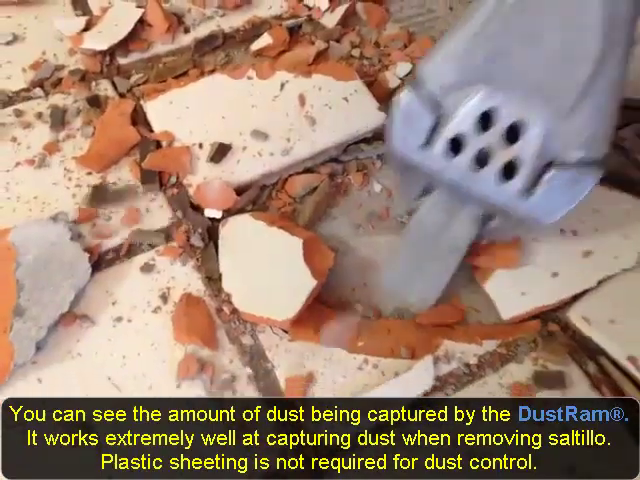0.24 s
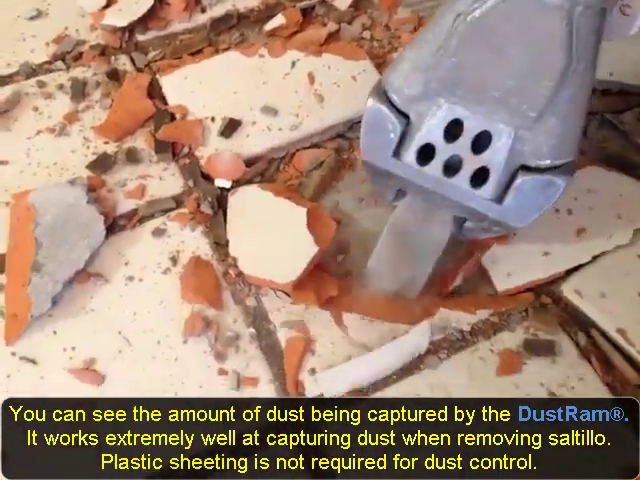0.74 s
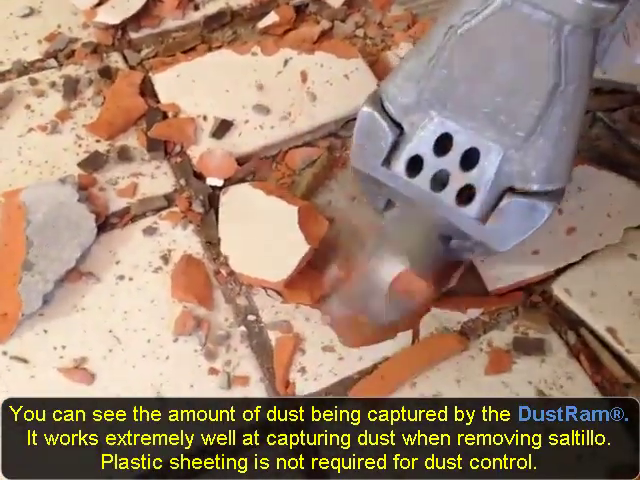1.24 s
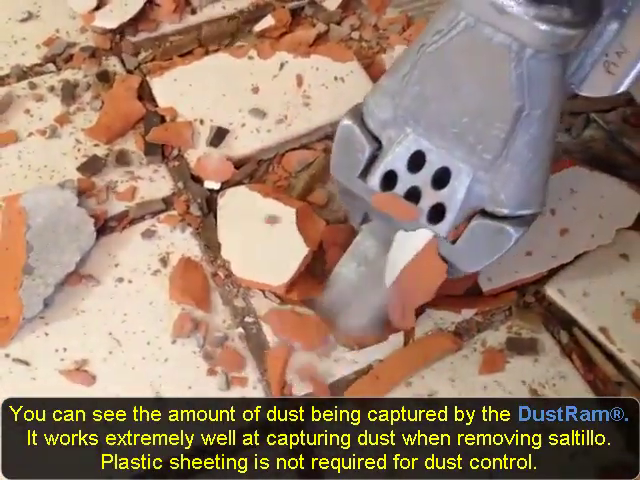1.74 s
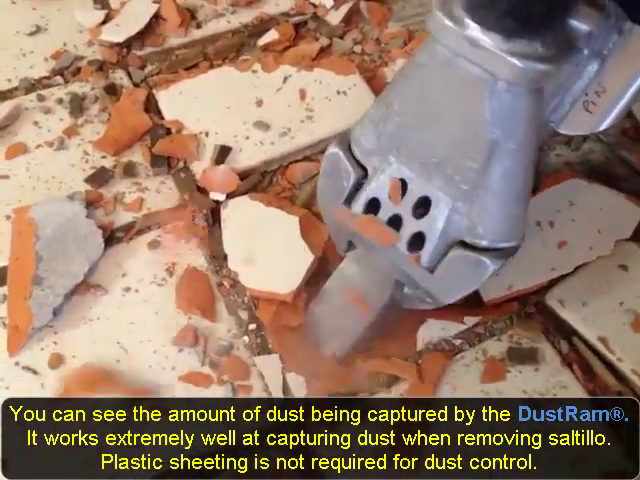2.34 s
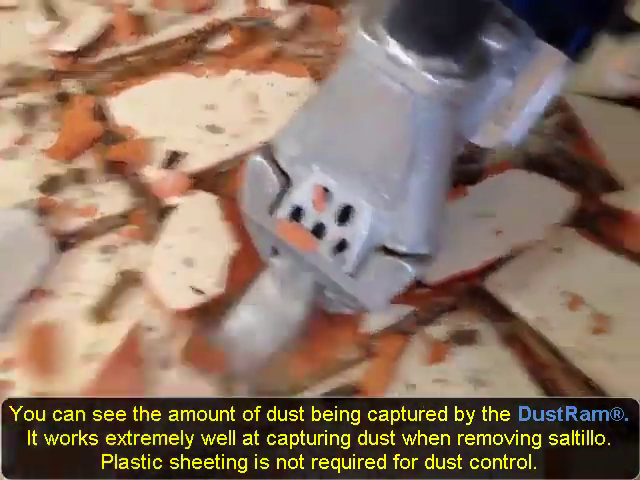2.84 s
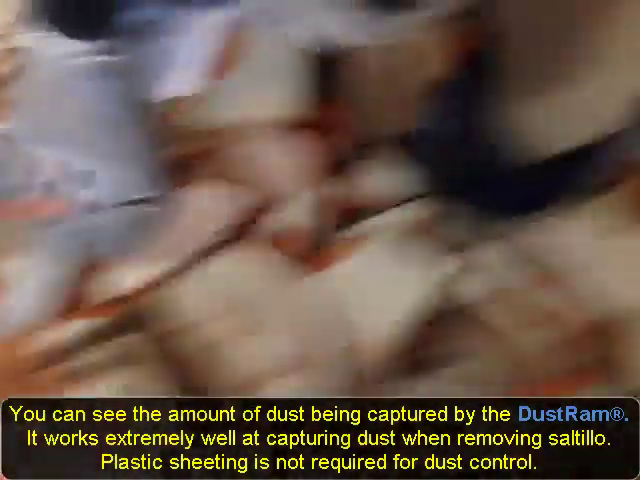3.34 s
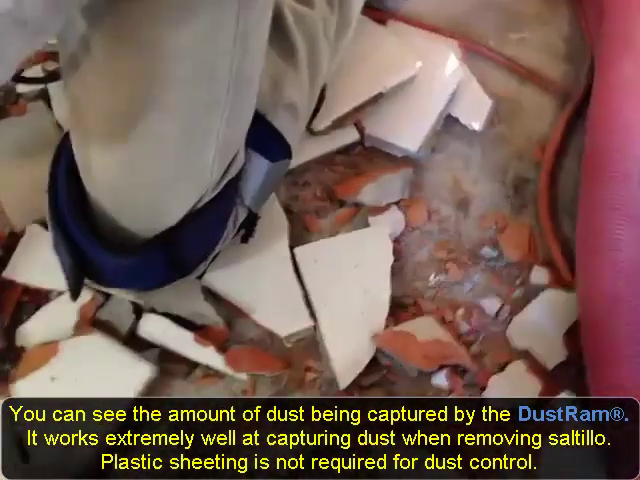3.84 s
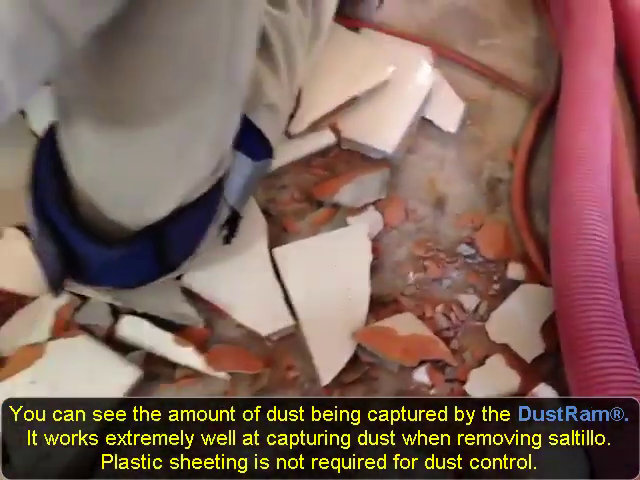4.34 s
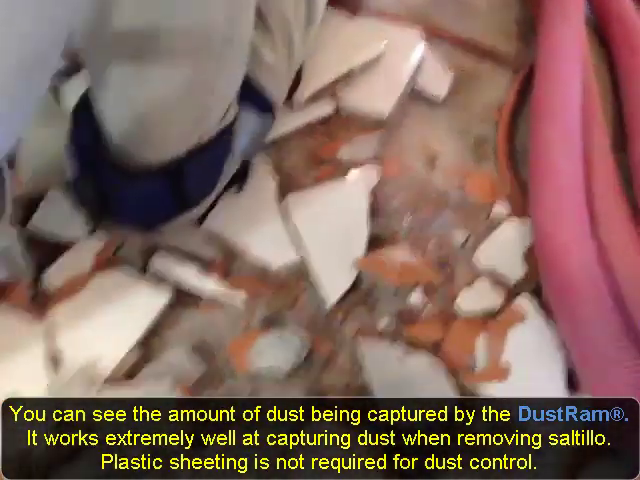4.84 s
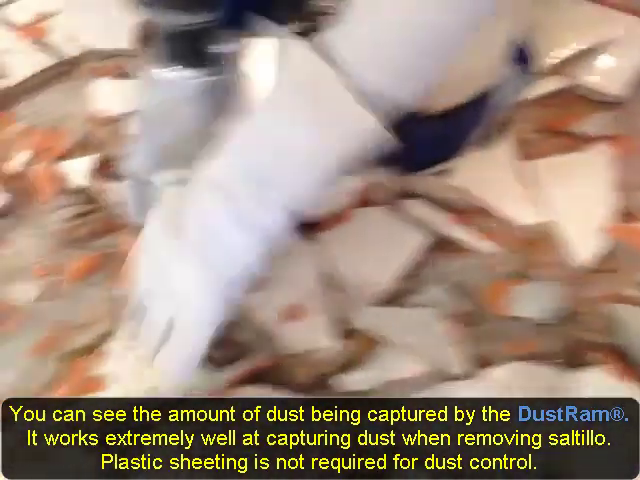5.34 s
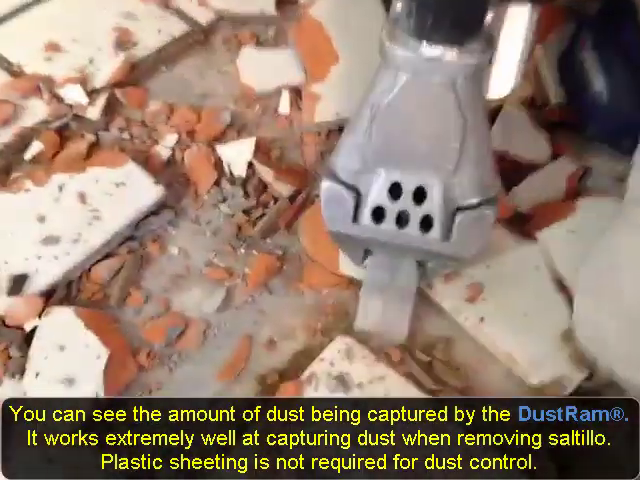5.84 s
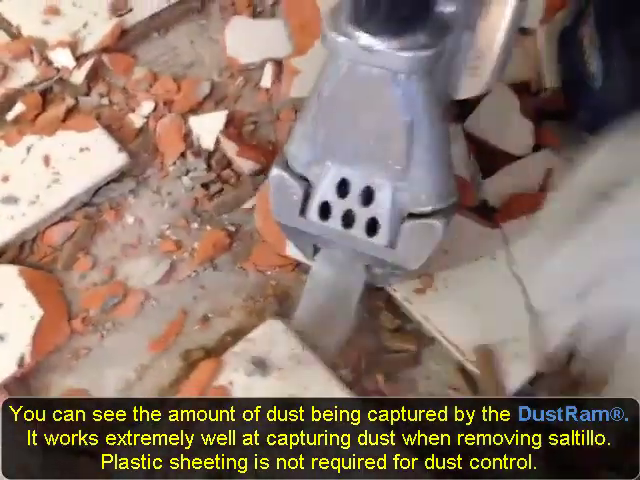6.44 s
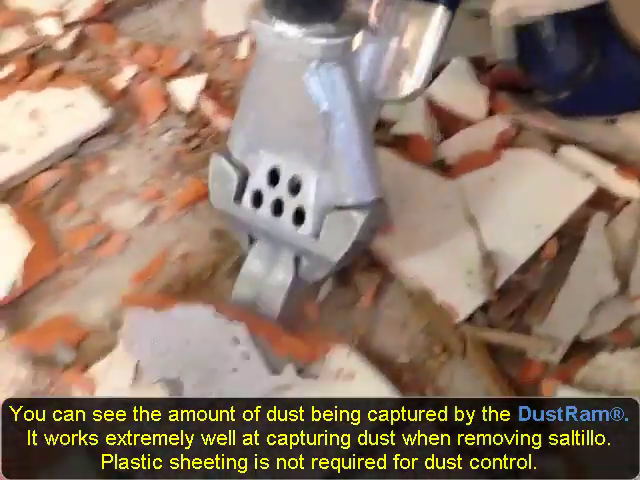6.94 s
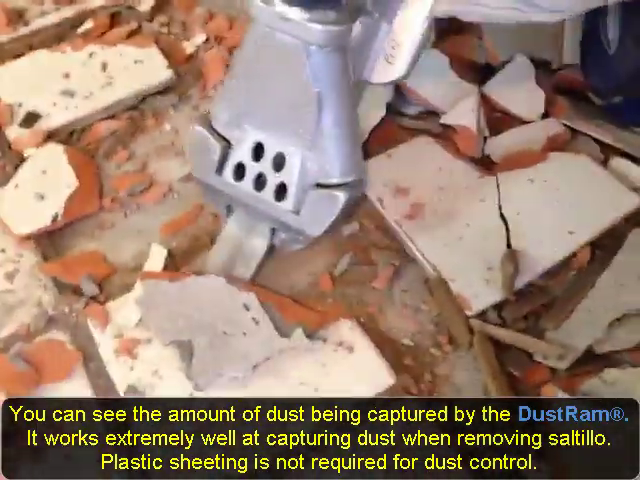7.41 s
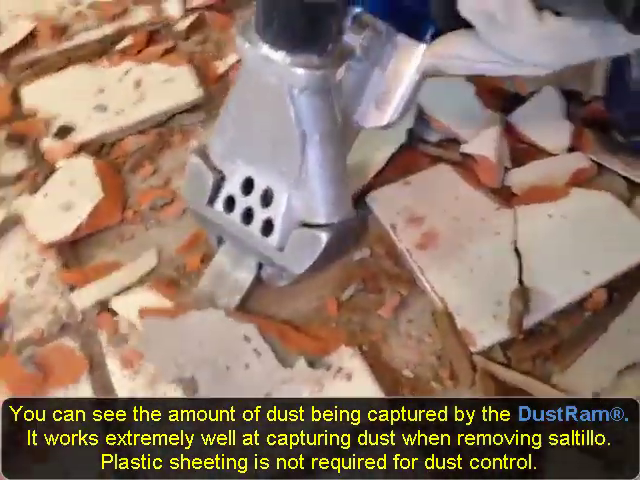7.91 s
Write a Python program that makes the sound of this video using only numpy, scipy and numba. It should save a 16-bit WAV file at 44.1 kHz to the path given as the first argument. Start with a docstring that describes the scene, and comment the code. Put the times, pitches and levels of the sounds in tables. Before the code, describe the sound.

Close, gritty machine-gun hammering of a steel chisel on brittle floor tile, about fifty blows a second, with shrill metallic ringing, dull slab thuds and loose pieces clunking. One long burst comes first, then a pause with only airy motor and suction noise, two short blips, and three more bursts separated by tiny gaps. Bare room with a short echo; the distorted microphone pumps, the motor swelling back after the blows.

```python
"""An electric demolition hammer chisels up clay floor tile in a bare room, close to a mono microphone.
About fifty blows a second drive cracking and grinding noise, ringing steel modes and slab thuds;
thrown chips tick and loose pieces knock as decaying modes. The motor and dust suction, filtered noise
with hum and whines, run throughout. Blows overload the microphone, and its gain control ducks the rush."""
import sys
import numpy as np
from scipy import signal
from scipy.fft import rfft, irfft
from scipy.io import wavfile
from numba import njit

SR = 44100
rng = np.random.default_rng(int(sys.argv[2]) if len(sys.argv) > 2 else 0)


def unload_wav(signal):
    """Save mono or channel-first audio to the path in sys.argv[1] as 16-bit WAV at rate SR, clipped to [-1, 1]."""
    wavfile.write(
        sys.argv[1],
        SR,
        np.round(np.clip(np.atleast_2d(signal).T, -1, 1) * 32767).astype(np.int16),
    )


N = 360297
TIME = np.arange(N) / SR

# chisel pressed down, so that blows land: start t/s, end t/s, first rate f/Hz, settled rate f/Hz,
# force at touch level/dB, full force level/dB, lean-in time/s, ease-off time/s
BURSTS = [(0.2741, 2.99, 48.88, 51.33, -10.5, 7.5, .22, .05), (4.396, 4.53, 50, 50.04, -5.5, 7, 0.071, .03),
          (4.812, 4.94, 50.58, 51.2, -6, -5.5, 0.09, .015), (5.2815, 6.13, 50.29, 49.84, -12, 1, .5, .02),
          (6.1965, 6.79, 49.6, 49.06, -7.5, 10, .1, .005), (6.8945, 8.16, 50.52, 49.67, -5, 11.5, .36, .01)]


def undb(db):
    """Decibels to gain."""
    return 10 ** (np.asarray(db) / 20)


def curve(rows):
    """Rows (s, value) joined by straight lines."""
    return np.interp(TIME, *np.transpose(rows))


def unit(x):
    """Scaled to rms 1."""
    return x / np.sqrt(np.mean(x ** 2))


def noise(points):
    """Noise of rms 1, its spectrum drawn through (Hz, dB) points on a log-frequency axis."""
    hz, db = np.transpose(points)
    bin_hz = np.arange(N // 2 + 1) * SR / N
    gain_db = np.interp(np.log(np.maximum(bin_hz, 1)), np.log(hz), db)
    return unit(irfft(rfft(rng.standard_normal(N)) * undb(gain_db), N))


def ring(x, hz, t60):
    """One decaying mode; a unit pulse rings with amplitude near 1."""
    pole = np.exp((2j * np.pi * hz - np.log(1000) / t60) / SR)
    return signal.lfilter([0, pole.imag], [1, -2 * pole.real, abs(pole) ** 2], x + 1e-18)


def fade(x, decay_s):
    """Each pulse becomes an exponential decay."""
    return signal.lfilter([1], [1, -np.exp(-1 / (decay_s * SR))], x + 1e-18)


def burst(x, shape, contact_s=.0058):
    """Each pulse plays shape(t), choked when the chisel seats on the tile again."""
    t = TIME[:SR // 40]
    choke = np.hypot(1, (t / contact_s) ** 5)
    return signal.oaconvolve(x, shape(t) / choke)[:N]


def pulses(times, sizes):
    """Pulses at the given times, each shared between two samples."""
    at = np.clip(times * SR, 0, N)
    i = at.astype(int)
    early = np.bincount(i, sizes * (1 - at + i), N + 2)
    late = np.bincount(i + 1, sizes * (at - i), N + 2)
    return (early + late)[:N]


def walk(rate_hz):
    """Random level of rms 1, straight lines between 1024 knots; holds the last knot once they run out."""
    knots = rng.standard_normal(1024)
    return unit(np.interp(TIME * rate_hz, np.arange(len(knots)), knots))


def bumps(times, rows, width_s):
    """A Gaussian bump for each row (s, height)."""
    return sum(height * np.exp(-((times - s) / width_s) ** 2) for s, height in rows)


def crank_rate(idle_hz=51.3, settle_s=1.2):
    """Turns a second: idle between bursts; in each one the speed settles towards what the load allows."""
    rate_hz = np.full(N, idle_hz)
    for start, end, first_hz, settled_hz, *_ in BURSTS:
        since_s = np.maximum(TIME - start, 0)
        loaded_hz = settled_hz + (first_hz - settled_hz) * np.exp(-since_s / settle_s)
        rate_hz = np.where((TIME >= start) & (TIME < end), loaded_hz, rate_hz)
    return rate_hz


def blows(scatter_db, ease_db=19, bite_s=.04, slip_s=.04, lead_s_per_db=.0002):
    """Time and size of every blow, one per crank turn: the worker leans in, holds and eases off."""
    # edge catches on firm tile and bites harder: t/s, extra force level/dB
    bite_rows = [(.44, 5.5), (1.969, 2), (2.75, 6), (2.9, 7), (5.8, 4), (6.06, 12), (7.04, 7)]
    # tile gives way and the chisel slips: t/s, force lost level/dB
    slip_rows = [(.5, 4), (1.8, 5.5), (2.81, 11.5), (5.72, 5.5), (5.931, 10)]
    turns = np.cumsum(crank_rate()) / SR
    times, force_db = [], []
    for start, end, _, _, touch_db, full_db, lean_s, ease_s in BURSTS:
        first_turn, last_turn = np.interp([start, end], TIME, turns)
        t = np.interp(np.arange(first_turn, last_turn), turns, TIME)
        lean_db = np.interp(t - start, [0, lean_s], [touch_db, full_db])
        lost_db = np.interp(end - t, [0, ease_s], [ease_db, 0])
        times.append(t)
        force_db.append(lean_db - lost_db)
    times = np.concatenate(times)
    force_db = np.concatenate(force_db)
    force_db = force_db + bumps(times, bite_rows, bite_s) - bumps(times, slip_rows, slip_s)
    sizes = undb(force_db + scatter_db * rng.standard_normal(len(times)))
    # pressed harder, the chisel sits higher and meets the piston sooner
    return times - lead_s_per_db * force_db, sizes


def crunch(times, sizes, db=4, crack_s=0.0013, grind_db=-17, grind_rise_s=0.00018,
           crumble_db=-29, crumble_s=0.013, bite_power=1.374, grit_db=3, scatter_db=1.5):
    """Clay cracks at each blow and grinds under the edge; the deeper the bite, the more crumbles after."""
    # crunch spectrum: f/Hz, relative density level/dB
    crunch_spectrum = [(300, -42), (1000, -45.5), (2000, -11), (3000, -1), (4200, 3), (5300, 5.5),
                       (7500, 4.5), (9500, 9), (10800, -15.5)]
    crack = fade(pulses(times, sizes), crack_s)
    scatter = undb(scatter_db * rng.standard_normal(len(times)))
    bites = pulses(times, sizes ** bite_power * scatter)
    grind = burst(bites, lambda t: 1 - np.exp(-t / grind_rise_s))
    # at 700 knots/s the grit varies for the first 1.46 s, then holds
    crumble = fade(bites, crumble_s) * undb(grit_db * walk(700))
    envelope = crack + undb(grind_db) * grind + undb(crumble_db) * crumble
    return undb(db) * noise(crunch_spectrum) * envelope


def singing(times, start, end, fade_s=0.042):
    """0 to 1: how fully the chisel is seated for one mode between start and end."""
    return np.clip(.5 + np.minimum(times - start, end - times) / (2 * fade_s), 0, 1)


def chisel(times, sizes, db=0, scatter_db=4.5, jitter_s=.00008, free_db=-20, bite_power=1.214):
    """Every blow rings the steel with a new mix of modes; a little of the ring outlasts the contact."""
    # chisel modes: f/Hz, t60/s, level/dB
    modes = [(4150, 0.075, -41), (5290, 0.033, -19.5), (5560, 0.012, -15), (6890, 0.042, -12),
             (8140, 0.051, -17.5), (8930, 0.028, -5), (9280, 0.014, -12.5), (9710, 0.095, -16),
             (10320, 0.063, -12), (10730, 0.28, -19)]
    # the chisel's seat in the tile lets one mode sing out: start t/s, end t/s, mode f/Hz, extra level/dB
    sing_rows = [(.41, .69, 8930, 10.5), (.49, 1.25, 10320, 7.5), (1.0, 1.25, 4150, 21),
                 (1.65, 2.06, 6890, 12.5), (2.33, 2.48, 6890, 12), (2.74, 2.97, 8930, 8),
                 (4.38, 4.53, 8930, 10), (4.8, 4.95, 5290, 12), (5.3, 5.59, 5560, 13.5),
                 (5.66, 6.14, 9280, 16.5), (6.25, 6.8, 8930, 8), (6.98, 7.5, 8930, 10),
                 (6.42, 6.75, 8140, 16.5), (7.53, 8.2, 10730, 7.5)]
    mode_hz = np.array(modes)[:, 0]
    out = 0
    for k, (hz, t60, mode_db) in enumerate(modes):
        shift, scatter = rng.standard_normal((len(times), 2)).T
        extra_db = 0
        for start, end, sing_hz, lift_db in sing_rows:
            if np.argmin(abs(mode_hz - sing_hz)) == k:
                extra_db = extra_db + lift_db * singing(times, start, end)
        hit_gain = undb(mode_db + extra_db + scatter_db * scatter)
        hits = pulses(times + jitter_s * shift, sizes ** bite_power * hit_gain)
        choked = burst(hits, lambda t: np.sin(2 * np.pi * hz * t) * undb(-60 * t / t60))
        out = out + choked + undb(free_db) * ring(hits, hz, t60)
    return undb(db) * out


def slab(times, sizes, db=-19, decay_s=0.0053, rebound_s=.0125, rebound_db=-9, scatter_db=4.5,
         thump_db=-30, thump_hz=115, thump_t60=0.022):
    """The floor thuds under each blow and again when the tool drops back on it."""
    # thud spectrum: f/Hz, relative density level/dB
    thud_spectrum = [(25, -30), (60, -15), (110, -5), (250, -19), (480, 3.5), (900, -10), (1600, -9),
                     (4000, -4.5)]
    first, second = undb(scatter_db * rng.standard_normal((len(times), 2))).T
    hits = pulses(times, sizes * first)
    hits = hits + undb(rebound_db) * pulses(times + rebound_s, sizes * second)
    thud = noise(thud_spectrum) * fade(hits, decay_s)
    thump = ring(pulses(times, sizes), thump_hz, thump_t60)
    return undb(db) * thud + undb(thump_db) * thump


def chips(times, sizes, db=-25, spread_db=0.5, flight_s=.03, cycles=22, low_hz=750, high_hz=7000,
          pitches=24, chips_per_pitch=36):
    """Random blows throw off chips of many sizes; each ticks dully at its own pitch on landing."""
    out = 0
    for hz in np.geomspace(low_hz, high_hz, pitches):
        thrown = rng.integers(0, len(times), chips_per_pitch)
        flight, weight = rng.exponential(size=(chips_per_pitch, 2)).T
        landing_sizes = sizes[thrown] * undb(spread_db * np.minimum(weight, 2))
        landings = pulses(times[thrown] + flight_s * flight, landing_sizes)
        out = out + ring(landings, hz, cycles / hz)
    return undb(db) * out


def knocks(db=-4, t60=0.037, overtone=2.0, overtone_db=-6):
    """Loose pieces of tile clunk on the slab with two short plate modes."""
    # knocks: t/s, level before the common gain/dB, f/Hz
    knock_rows = [(.942, -2, 716), (1.615, -1, 1270), (1.695, -7, 1000), (2.406, -1, 780), (2.66, -3, 657),
                  (2.82, -4.5, 490), (6.659, -1, 440), (7.846, -6, 510), (7.885, -5, 545.3)]
    out = 0
    for s, knock_db, hz in knock_rows:
        hit = pulses(np.array([s]), undb([knock_db]))
        out = out + ring(hit, hz, t60) + undb(overtone_db) * ring(hit, hz * overtone, t60)
    return undb(db) * out


def room(x, db=-17, t60=0.17, gap_s=0.0032):
    """Bare walls and floor return a dense, short tail of decaying noise."""
    t = TIME[:SR]
    tail = rng.standard_normal(SR) * undb(-60 * t / t60) * (t > gap_s)
    return undb(db) * signal.fftconvolve(x, tail / np.linalg.norm(tail))[:N]


def motor(db=-19.5, waver_db=3.5, throb=0.123):
    """Cooling air and suction rush, the crank gear hums, motor and fan whine unsteadily."""
    # level by nearness of motor and suction: t/s, level before the common gain/dB
    near_rows = [(0, 0.5), (.5, -4.5), (1.5, 4), (3.1, 2.5), (4.35, 0), (5.0, -2.5), (5.9, -1.5),
                 (6.85, -2.5), (8.15, 4)]
    # rush spectrum: f/Hz, relative density level/dB
    rush_spectrum = [(18, -54), (30, -24), (122, -16.5), (149, -12), (275, -13.5), (398, -11.5),
                     (462, -6.5), (814, -11.5), (1540, -5), (1700, -5), (2930, -4), (5420, -5), (7460, -11),
                     (8240, -7.5), (10800, -16), (14000, -69), (22000, -120)]
    # crank gear hum: multiple of crank rate, level re rush/dB
    hum_rows = [(2, -38), (3, -26), (4, -32), (5, -34), (6, -30), (7, -34), (9, -28)]
    # motor and fan whines: f/Hz, bandwidth f/Hz, level re rush/dB
    whine_rows = [(1565, 160, -15), (2860, 280, -15), (3770, 180, -16), (5296, 30, -22), (8020, 55, -18),
                  (8850, 120, -22)]
    angle = 2 * np.pi * np.cumsum(crank_rate()) / SR
    air = noise(rush_spectrum) * (1 + throb * np.cos(angle))
    hum = 0
    for multiple, line_db in hum_rows:
        gain = undb(line_db + waver_db * walk(6.8))
        phase = 2 * np.pi * rng.random()
        hum = hum + gain * np.sqrt(2) * np.sin(round(multiple) * angle + phase)
    whine = 0
    for hz, width_hz, line_db in whine_rows:
        gain = undb(line_db + waver_db * walk(9.6))
        t60 = np.log(1000) / (np.pi * width_hz)
        whine = whine + gain * unit(ring(rng.standard_normal(N), hz, t60))
    return undb(db + curve(near_rows)) * (air + hum + whine)


def scene():
    """The work on the tile, its echo and the running motor, heard at one point."""
    times, sizes = blows(scatter_db=1.5)
    work = crunch(times, sizes) + chisel(times, sizes) + slab(times, sizes)
    work = work + chips(times, sizes) + knocks()
    return np.tile(work + room(work) + motor(), (2, 1))


@njit
def peak_follower(x, hold, fall):
    """Jumps to each peak, holds it for some samples, then sinks by a factor per sample."""
    out, e, age = np.empty(len(x)), x[0], 0.
    for i in range(len(x)):
        age += 1
        if x[i] > .9 * e:
            age = 0.
        if age > hold:
            e *= fall
        e = max(e, x[i])
        out[i] = e
    return out


def record(dry, out_db=-15.5, knee_db=-11, hold_s=0.04, release_db_per_s=30, start_db=-3,
           bass_hz=56, top_hz=10980):
    """The microphone overloads and drops the bass; gain control ducks at once and recovers slowly."""
    low_pass = signal.ellip(12, .2, 80, top_hz, fs=SR, output="sos")
    high_pass = signal.butter(2, bass_hz, "high", fs=SR, output="sos")
    clipped = signal.sosfilt(np.vstack([high_pass, low_pass]), np.tanh(dry[0]))
    # the gain control starts already ducked
    peaks = np.maximum(abs(clipped), undb(start_db) * (TIME == 0))
    held = peak_follower(peaks, float(hold_s * SR), float(undb(-release_db_per_s / SR)))
    levelled = undb(out_db) * clipped / np.maximum(held, undb(knee_db))
    return np.tile(signal.sosfilt(low_pass, levelled), (2, 1))


dry = scene()
out = record(dry)
unload_wav(out)
```